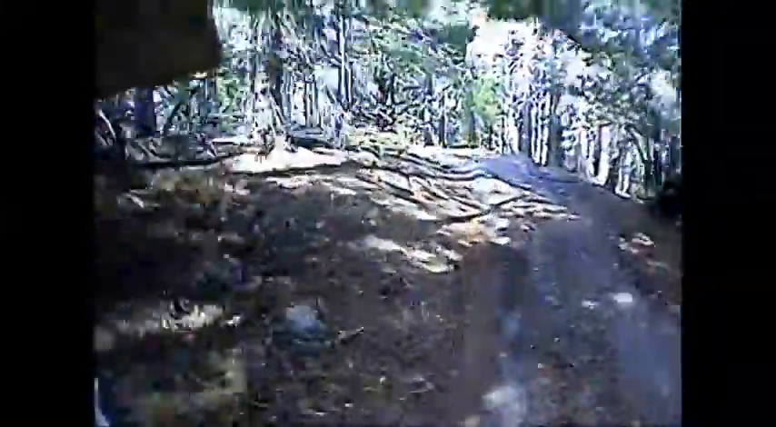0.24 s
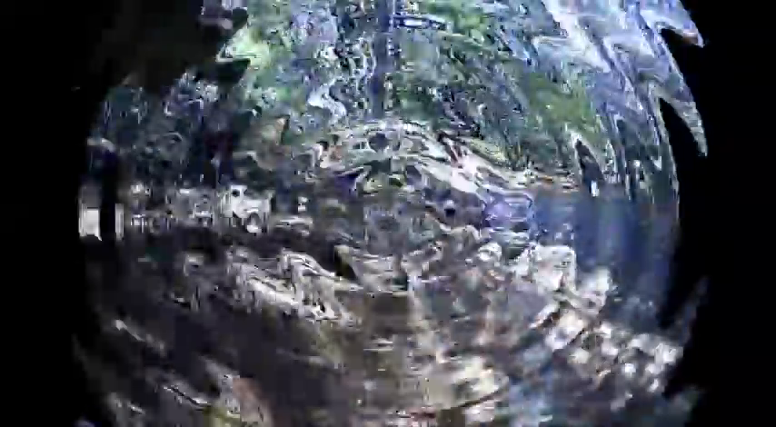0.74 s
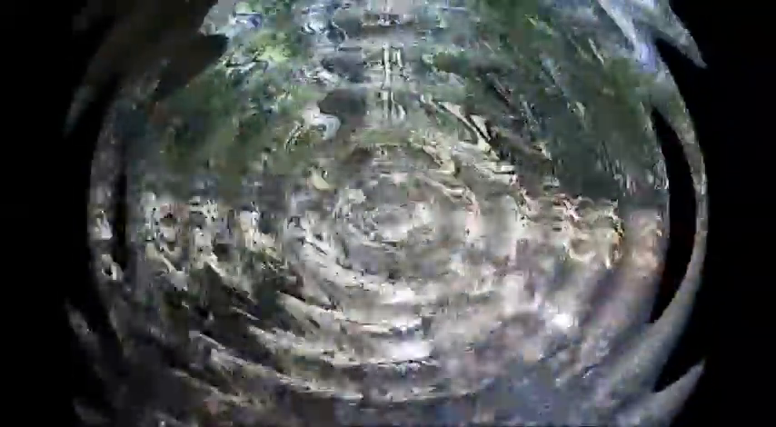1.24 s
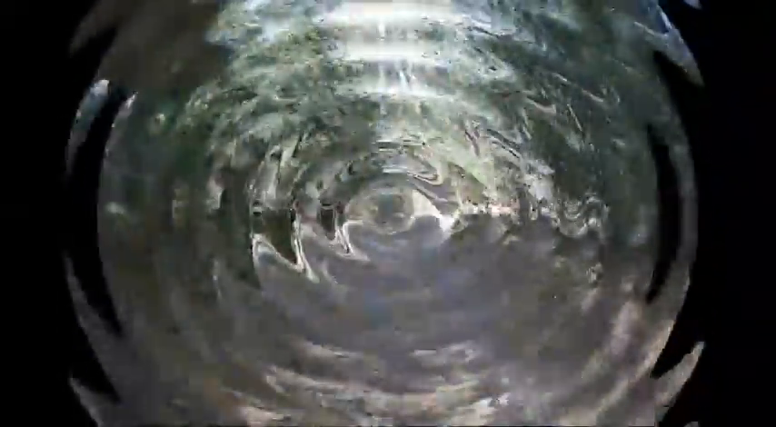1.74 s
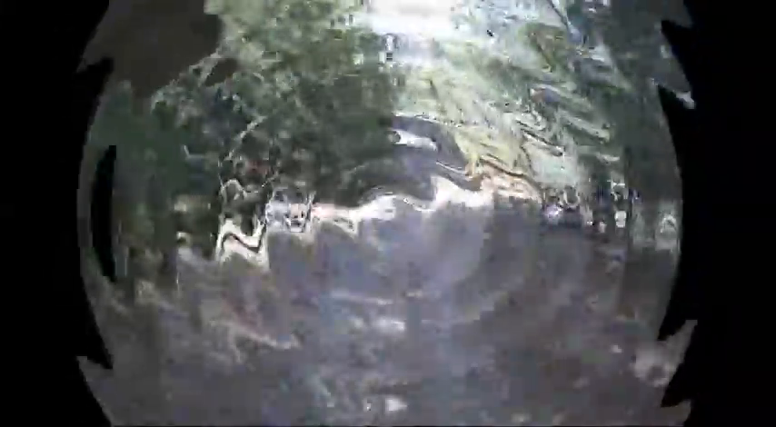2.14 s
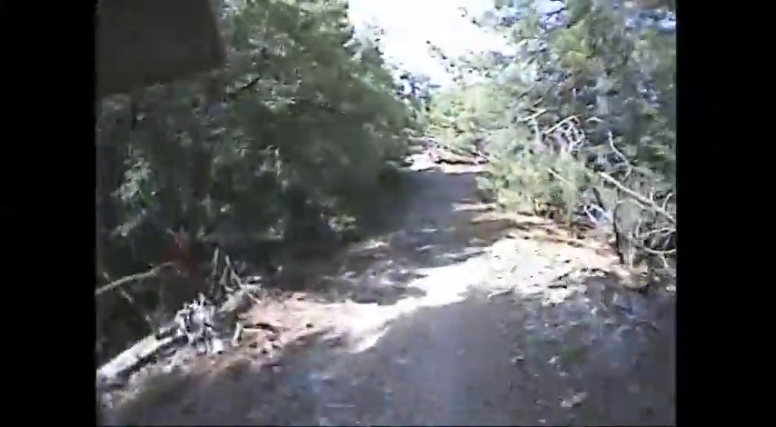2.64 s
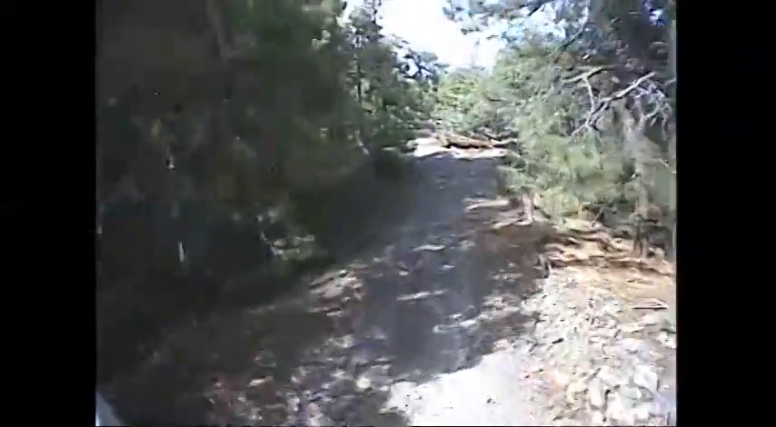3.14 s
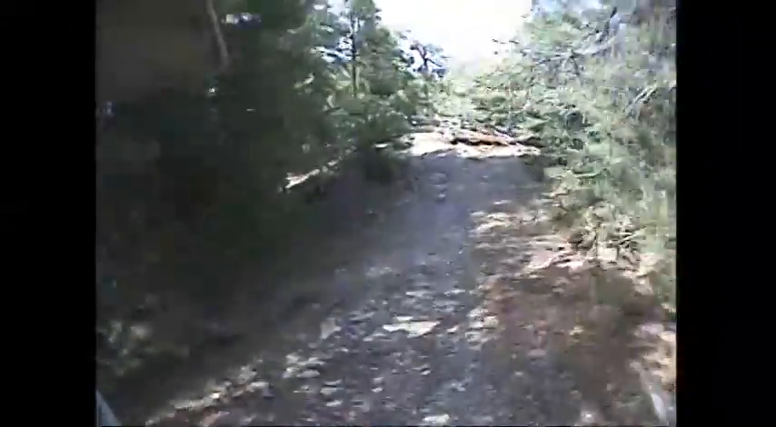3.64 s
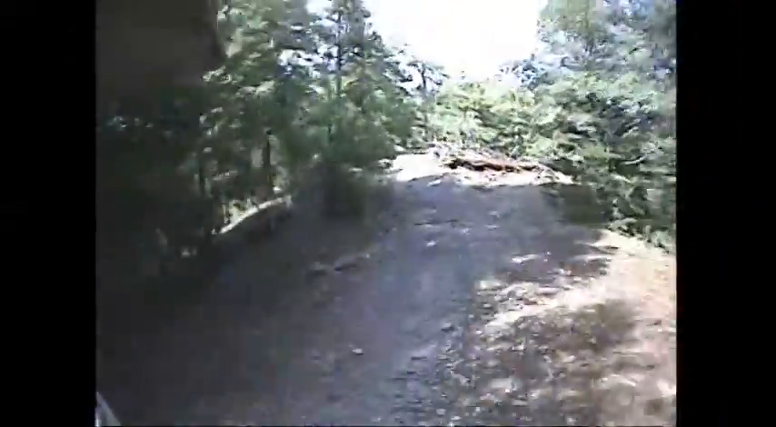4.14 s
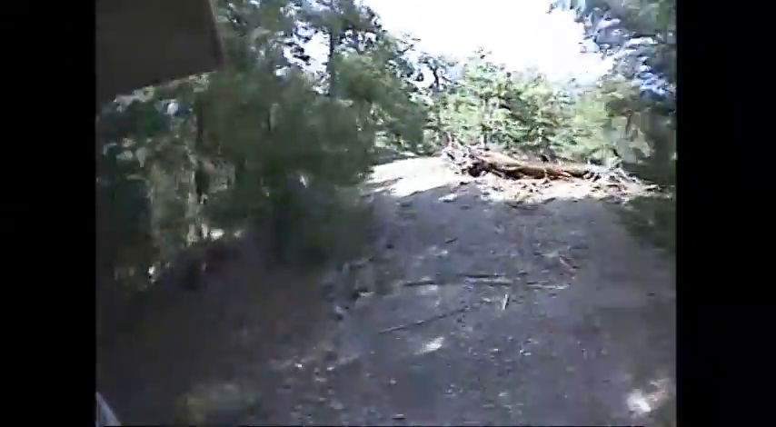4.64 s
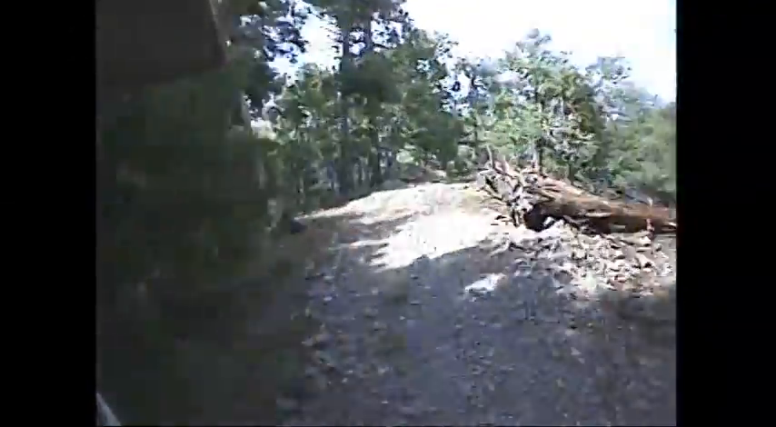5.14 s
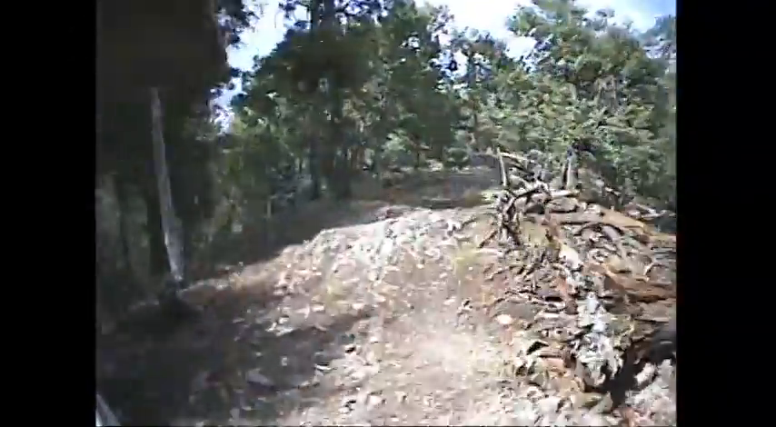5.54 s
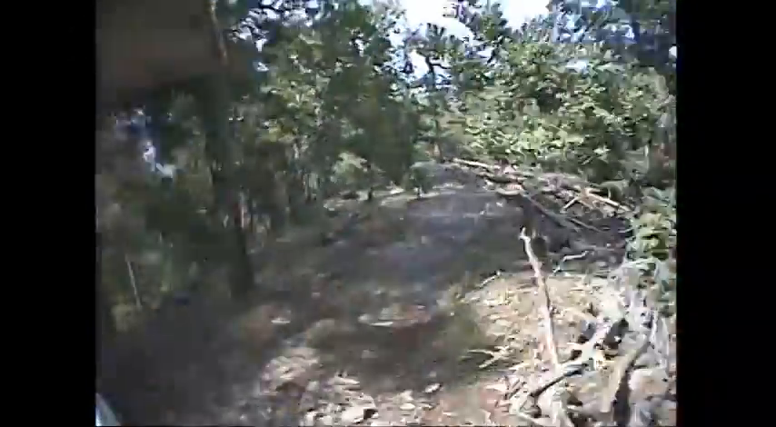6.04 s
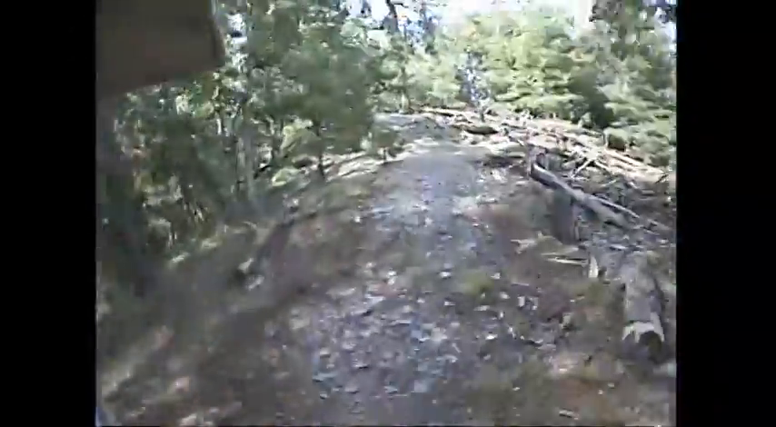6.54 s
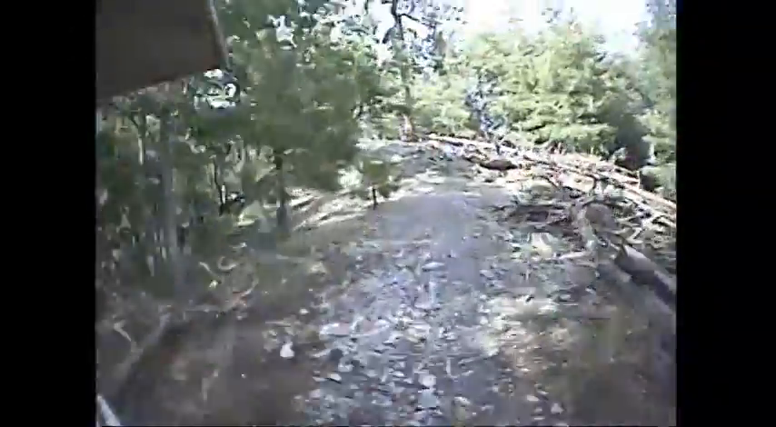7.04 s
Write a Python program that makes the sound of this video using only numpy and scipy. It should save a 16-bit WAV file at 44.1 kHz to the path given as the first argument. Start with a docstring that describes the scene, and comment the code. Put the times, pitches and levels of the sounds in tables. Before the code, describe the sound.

A bike rolls along a rough forest trail, wind rumbling, frame jolting and clunking over stones, with a burst of sharp twig cracks near the end.

```python
"""On a stony forest trail a bicycle rolls along, heard by a small microphone in a housing fixed to it.
Wind is slow, deep noise at the port (the housing's sound opening); tyres and hiss are coloured noise.
Stones shake the frame, which rings low and in the middle, or knock a tube with short blunt blows.
Grit ticks ring the housing; twigs brush past as scratchy noise, squeak and whip it.
Short fading tones make snaps and add treble to the cracks of the whipping twigs."""
import sys
import numpy as np
from scipy.fft import rfft, irfft, next_fast_len
from scipy.io import wavfile
from scipy.ndimage import uniform_filter1d, map_coordinates

SR = 44100
rng = np.random.default_rng(int(sys.argv[2]) if len(sys.argv) > 2 else 0)


def bounce(signal):
    """Save signal as a 16-bit WAV file at the path given by the first command-line argument."""
    frames = np.transpose(np.atleast_2d(signal))
    limited = np.clip(frames, -1, 1)
    pcm = np.round(limited * 32767).astype(np.int16)
    wavfile.write(sys.argv[1], SR, pcm)


N = 321489

# Levels are settings that guide each layer: body gains and random swings also shape the final loudness.
# Wind strength over time: t/s, level/dB
WIND_LEVEL = [(0, -18.5), (.25, -19), (.45, -12.5), (.8, -21.5), (1.05, -18), (1.3, -21.5), (1.5, -17.5),
              (1.9, -20), (2.5, -24), (2.85, -21), (3.1, -18), (3.4, -23), (3.85, -16), (4.2, -18.5),
              (4.6, -14), (5.05, -15), (5.4, -18), (5.75, -20.5), (5.92, -24), (6.25, -23.5), (6.45, -17),
              (6.75, -24.5), (7.0, -23), (7.29, -25.5)]
# Colour of the wind noise: f/Hz, level per Hz/dB
WIND_COLOUR = [(4, 12), (9, -11.5), (30, 1), (70, -9.5), (150, -18.5), (260, -29), (600, -48),
               (1500, -82.5), (3000, -120)]
# Rolling sounds over time: t/s, frame rumble level/dB, tyre level/dB, hiss level/dB
ROLLING_LEVELS = [(0.0, -40, -48, -71), (0.36, -34, -49, -69), (0.63, -37, -50.5, -72),
                  (1.54, -41.5, -53, -74.5), (1.93, -38, -53, -74), (2.25, -37.5, -53, -73),
                  (2.7, -33.5, -50.5, -70.5), (3.13, -39.5, -50.5, -71.5), (4.18, -33.5, -47, -67),
                  (4.41, -29.5, -49, -66.5), (4.69, -31.5, -49, -70), (5.26, -29.5, -47, -67.5),
                  (5.6, -32.5, -49.5, -68), (5.97, -40.5, -52.5, -70), (6.25, -33.5, -51, -66),
                  (6.58, -36, -47.5, -63.5), (6.8, -43, -60, -63), (7.07, -38.5, -53.5, -71),
                  (7.29, -40, -53, -72.5)]
# Colour of tread on dirt: f/Hz, level per Hz/dB
TYRE_COLOUR = [(600, -26), (950, 1), (1400, -9.5), (1900, -14.5), (2400, -22), (3300, -20.5), (3950, -23),
               (4450, -37), (5500, -38), (7000, -42), (9000, -65.5)]
# Colour of the thin hiss: f/Hz, level per Hz/dB
HISS_COLOUR = [(4000, -33), (5500, -8.5), (7500, -12), (9000, -10.5), (10800, -5), (11900, -6),
               (13000, -2.5), (14000, -9), (15700, -18.5)]
# Twig squeaks: t/s, length/s, start f/Hz, end f/Hz, level/dB
SQUEAKS = [(.122, 0.017, 10500, 10600, -61), (6.343, .02, 10500, 10700, -60),
           (6.372, .025, 11200, 11900, -51)]
# Short rings of snaps, and high rings within the twig cracks: t/s, level/dB, f/Hz
SNAP_RINGS = [(1.0975, -43, 2600), (4.0715, -37, 2600), (5.027, -49, 3000), (5.263, -33, 2100),
              (5.275, -32, 2400), (5.2877, -27.5, 3600), (5.2877, -30, 6000), (5.2877, -41, 8500),
              (5.298, -41, 3200), (5.299, -33, 11000), (5.2997, -37, 9500), (5.2996, -32, 2200),
              (5.3055, -42, 3300), (5.333, -44, 4000), (5.343, -46, 5000), (5.435, -45, 9000),
              (5.437, -34, 1500), (6.4218, -30, 9300), (6.4669, -23, 8240), (6.4218, -14, 5300),
              (6.4676, -12.5, 5650), (6.527, -35, 2100), (6.6043, -33, 2300), (6.7065, -43, 2600),
              (6.725, -26.5, 2400), (6.74, -33, 4200), (6.747, -26.5, 3000), (6.81, -40, 2800)]
# Brush strokes: t/s, length/s, low rasp level/dB, high rasp level/dB, wall level/dB, port level/dB
BRUSH_STROKES = [(0.11, 0.07, -64, -72, -66, -65), (1.099, 0.074, -58, -63.5, -76, -74),
                 (4.26, 0.088, -64, -64, -61, -64), (5.143, 0.11, -62, -72, -57, -66.5),
                 (5.253, 0.091, -65, -69, -46.5, -57.5), (5.33, 0.11, -68, -75, -51.5, -69),
                 (6.024, 0.037, -78, -80, -55, -68), (6.152, 0.029, -61, -70, -59, -64),
                 (6.3, 0.085, -71, -71, -46.5, -66), (6.339, .09, -61, -61, -51.5, -61),
                 (6.406, 0.096, -60, -63, -46, -58), (6.45, 0.03, -41.5, -55, -50.5, -58),
                 (6.469, 0.07, -49.5, -67, -48, -58), (6.498, 0.092, -53, -62, -47, -61),
                 (6.541, 0.059, -58, -53, -46, -60.5), (6.583, 0.048, -58, -66.5, -62, -66.5),
                 (6.622, 0.078, -63, -72, -69, -69.5), (6.689, 0.044, -59, -68, -52, -63.5),
                 (6.725, 0.06, -55, -71, -46, -60.5), (6.77, 0.055, -58, -71, -53, -66),
                 (6.804, 0.18, -68, -77, -55.5, -70), (6.958, 0.057, -62, -73, -53, -66),
                 (6.997, 0.055, -57, -65, -53, -69), (7.03, 0.1, -67, -76, -57, -74)]
# The cavity under a steady rub: f/Hz, width/Hz, level/dB
RASP_MODES = [(3900, 1100, 0), (5350, 1100, 0)]
# Grit hits: t/s, level/dB, wall level relative to the hit/dB
GRIT_TICKS = [(0.075, -54, -3), (0.115, -48, 10), (0.3177, -34.5, -15), (0.481, -35, -8), (0.655, -53, -7),
              (0.661, -53, 5), (0.839, -42, -13), (0.87, -34.5, -19), (0.823, -55, -5), (0.831, -53, -5),
              (0.9353, -54, -4), (0.94, -56, 1), (0.969, -54, -5), (1.128, -43, 1), (1.2273, -52, -4),
              (1.267, -56, -5), (1.3468, -51, 0), (1.5942, -42, -9), (1.7394, -50, 2), (1.8821, -53, 6),
              (2.048, -48, -15), (2.7845, -45.5, 5), (3.137, -40.5, -9), (3.4057, -45, 7),
              (3.852, -36.5, -17), (3.921, -49, 1), (4.0503, -47, -12), (4.0713, -33.5, 1), (4.271, -41, 1),
              (4.3009, -35, -17), (4.8908, -49, 11), (5.101, -49, 0), (5.147, -46, 12), (5.151, -54, 8),
              (5.172, -54, 5), (5.208, -52, 5), (5.221, -45, -9), (5.587, -44, -10), (5.837, -53, 19),
              (6.0965, -54, 17), (6.308, -50, 0), (6.319, -50, 12), (6.378, -45, 0), (6.4077, -39, -6),
              (6.4172, -47, 5), (6.431, -40, 0), (6.447, -42, -5), (6.494, -35, -13), (6.573, -35, -5),
              (6.605, -41, -5), (6.668, -47, -12), (6.7249, -40, -5), (6.775, -37.5, -10),
              (6.844, -45.5, 16.5), (6.857, -36.5, -20), (6.9166, -50, 15), (6.977, -42, 8),
              (7.004, -43, 11), (7.0084, -40, -13), (7.021, -44, -12), (7.0328, -38.5, -9),
              (7.0645, -51, 11), (7.0903, -51, -5), (7.084, -53, -5), (7.1144, -53, -3), (7.1916, -52, -8)]
# Twigs whipping the housing: t/s, level/dB, wall and port levels relative to the hit/dB, 60 dB fall time/s
TWIG_CRACKS = [(6.4212, -10, 4, -27, .0003), (6.4569, -27, 15, -35, .0003), (6.4657, -32, 14, -24, .0003),
               (6.467, -17, 0, -4, .0025), (6.4675, -18, -15, -20, .0003), (6.468, -16, -15, -20, .0003)]
# Cavity in front of the microphone: f/Hz, width/Hz, level/dB
CAVITY_MODES = [(3980, 650, 8), (5250, 1100, -1.5), (6700, 2000, -5)]
# The housing's wall: f/Hz, width/Hz, level/dB
WALL_MODES = [(600, 400, 2.5), (1410, 610, 7), (2930, 2300, -0.5)]
# The port's upper resonances: f/Hz, width/Hz, level/dB
PORT_MODES = [(8500, 1500, 2), (10800, 1500, -4), (12900, 1500, 1)]
# Hard stones on the tube: t/s, level/dB, bright part relative to the blow/dB
TUBE_KNOCKS = [(0.321, -25, -23), (0.739, -31, -23), (1.647, -15.5, -15), (1.746, -17.5, -14),
               (1.786, -19, -28), (2.208, -20, -24), (2.502, -22.5, -13), (2.659, -30, -23),
               (3.446, -40, -18), (3.724, -17, -21), (4.064, -33, -13), (4.267, -21, -20), (4.51, -19, -20),
               (4.531, -15, -21), (4.55, -33, -22), (5.226, -26, -23), (5.261, -10.5, -14),
               (5.347, -16, -39), (5.5691, -8, -35), (5.572, -17.5, -26), (5.839, -34.5, -5.5),
               (6.038, -26, -11), (6.117, -34, -23), (6.909, -21.5, -14.5), (7.107, -25, -20)]
# The struck tube: f/Hz, width/Hz, level/dB
TUBE_MODES = [(713, 405, 4), (1150, 660, 2.5)]
# Large stones under the bicycle: t/s, level/dB, low resonance relative to the jolt/dB
LARGE_JOLTS = [(0.053, -19.5, -19), (0.087, -19.5, -15), (0.143, -17, -6.5), (0.312, -18, -10),
               (0.322, -10.5, -22), (0.333, -20, 2.5), (0.37, -19.5, -18), (0.382, -16, -4.5),
               (0.458, -16, -6), (0.58, -17, -20), (0.739, -17.5, -8), (0.947, -17.5, -9),
               (1.161, -20, -11), (1.934, -25, 10), (1.971, -20.5, -8), (2.261, -26, -4), (2.658, -19, -15),
               (2.694, -15, -4), (2.737, -32, -10), (3.215, -20.5, 2), (3.446, -17.5, -10),
               (3.491, -18.5, -14), (3.603, -14.5, -21), (3.727, -15.5, -16), (3.823, -12.5, -24),
               (3.986, -12.5, -13), (4.063, -16.5, -14), (4.118, -20, -8), (4.148, -16.5, -21),
               (4.163, -16, -21), (4.211, -27.5, 15.5), (4.268, -16.5, 8), (4.349, -13, -2.5),
               (4.389, -14, -18), (4.449, -9.5, -5), (4.471, -10, 2.5), (4.511, -20, 4), (4.531, -23, 12),
               (4.597, -15.5, -7), (4.653, -17, -9), (4.806, -14.5, -7), (4.86, -20, 12), (4.919, -18, 9.5),
               (5.146, -12, -2), (5.225, -14, -25), (5.2748, -12, -24), (5.282, -16, -19), (5.345, -14, -2),
               (5.512, -21, -15), (5.573, -29, -11), (6.038, -18.5, -12), (6.115, -19.5, 2),
               (6.227, -20, -14), (6.244, -17.5, 6.5), (6.278, -29.5, 7.5), (6.327, -8.5, -4),
               (6.464, -14.5, 6), (6.697, -15.5, -8), (6.748, -15.5, -2.5), (6.851, -20, -10),
               (7.002, -29.5, 11), (7.104, -18, -22), (7.2, -23, -26)]
# The frame, lowest resonance first: f/Hz, width/Hz, level/dB
FRAME_MODES = [(296.8, 62, 0.5), (495, 192, -4), (692, 94.5, 0), (858, 137, -7.5)]
# Loose parts: f/Hz, width/Hz, level/dB
LOOSE_PART_MODES = [(1113, 270, 6.5), (1988, 960, -14.5)]

TOP_HZ = 15800
GUST_DB, GUSTS_PER_S = 2.5, 6  # size and pace of the random gusts
SNAP_CYCLES = 4  # a ring fades by 30 dB in this many cycles
STROKE_RISE, STROKE_FALL = .8, 1.2  # powers that round the swell and the fade
CATCHES_PER_S, CATCH_DB, CATCH_SPREAD_DB = 500, 11, 3.5  # needles that catch and let go
FINE_TICKS, FINE_TICK_DB = 8, -55  # extra ticks at random times
TICK_PORT_DB, TICK_T60_S = -26, .00025  # port share of a tick, and time for its push to fall 60 dB
SMALL_JOLTS = 14  # extra jolts at random times
SMALL_JOLT_DB, SMALL_SPREAD_DB = 4.5, 2.5  # level over the rumble setting, scatter
JOLT_T60_S = 0.072  # fall time of a shudder's envelope
KICK_DB = 1  # first blow of a jolt, over its shudder


def amp(db):
    """Turn decibels into a gain."""
    return 10 ** (np.asarray(db) / 20)


def unit(x):
    """Scale a sound to an average strength (rms) of 1."""
    return x / np.sqrt(np.mean(x ** 2) + 1e-20)


def curves(rows):
    """Draw straight lines between table rows: one curve for each column after the time."""
    times, *columns = np.transpose(rows)
    return [np.interp(np.arange(N) / SR, times, column) for column in columns]


def wobble(rate):
    """Make a smooth random curve through a given number of random points a second."""
    points = rng.standard_normal(int(N * rate / SR) + 4)
    return map_coordinates(points, [np.arange(N) * rate / SR])


def filtered(x, response):
    """Change the strength and phase of each frequency in a sound."""
    size = next_fast_len(N + SR // 2)
    spectrum = rfft(x, size) * response(np.fft.rfftfreq(size, 1 / SR))
    return irfft(spectrum, size)[:N]


def noise(colour):
    """Colour random noise by a table of frequencies and levels, at rms 1."""
    f, db = np.transpose(colour)

    def response(hz):
        return amp(np.interp(np.log(hz + 1), np.log(f + 1), db, -120, -120))

    return unit(filtered(rng.standard_normal(N), response))


def ring(x, modes):
    """Pass a sound through a body's resonances, where narrow ones ring longer."""
    def response(f):
        total = 0
        for k, (centre, width, db) in enumerate(modes):
            resonance = 1j * f * width / (centre * centre - f * f + 1j * f * width)
            total = total + (-1) ** k * amp(db) * resonance  # neighbours have opposite signs
        return total

    return filtered(x, response)


def dull(x, corner_hz, order):
    """Soften the treble, as rubber and clamps do; a higher order softens more."""
    return filtered(x, lambda hz: (1 + 1j * hz / corner_hz) ** -order)


def add(track, s, burst):
    """Lay a short sound on the track at time s."""
    part = track[round(s * SR):][:len(burst)]
    part += burst[:len(part)]


def wind():
    """Eddies press on the port; the diaphragm stiffens and flattens the strongest pushes."""
    level_db, = curves(WIND_LEVEL)
    pressure = unit(np.tanh(0.27 * noise(WIND_COLOUR)))
    return amp(level_db + GUST_DB * wobble(GUSTS_PER_S)) * pressure


def squeaks():
    """A twig slipping by gives a thin, rough whistle that slides upward."""
    track = np.zeros(N)
    for s, length, from_hz, to_hz, db in SQUEAKS:
        n = round(length * SR)
        rough = unit(uniform_filter1d(rng.standard_normal(n), size=40))
        phase = 2 * np.pi * np.cumsum(np.linspace(from_hz, to_hz, n)) / SR
        swell = np.hanning(n) ** .5
        add(track, s, amp(db + 2.5) * swell * rough * np.sin(phase))
    return track


def snap_rings():
    """Each row is one short ring at a set pitch; near-simultaneous rows form one snap or brighten a crack."""
    track, t = np.zeros(N), np.arange(400) / SR
    for s, db, hz in SNAP_RINGS:
        fade = amp(db + 5.5 - 30 * t * hz / SNAP_CYCLES)
        onset = 1 - np.exp(-2 * t * hz)
        add(track, s, fade * np.sin(2 * np.pi * hz * t) * onset)
    return track


def brush():
    """Twigs drag over the housing: dense scratches and sparse catches swell and fade in each stroke."""
    roughness = amp(1.2 * wobble(90) + 1.5 * wobble(250) + 2.4 * wobble(1100))
    scratches = rng.standard_normal(N) * roughness
    catches = rng.random(N) < CATCHES_PER_S / SR
    catch_db = CATCH_DB + CATCH_SPREAD_DB * rng.exponential(size=N).clip(0, 3)
    scratches += catches * rng.choice([-1, 1], N) * amp(catch_db)

    # each rasp resonance acts twice, which narrows it
    rasps = [(-1) ** k * ring(ring(scratches, [mode]), [mode]) for k, mode in enumerate(RASP_MODES)]
    wall = dull(ring(scratches, WALL_MODES), 4300, order=2)
    port = ring(ring(scratches, PORT_MODES), [(9500, 6000, 0)])

    pressure = np.zeros((4, N))
    for s, length, *levels_db in BRUSH_STROKES:
        u = np.linspace(0, 1, round(length * SR))
        swell = u ** STROKE_RISE * (1 - u) ** STROKE_FALL
        for track, db in zip(pressure, levels_db):
            add(track, s, amp(db) * swell / swell.max())
    return sum(gain * unit(body) for gain, body in zip(pressure, [*rasps, wall, port]))


def ticks():
    """Grit and twigs hit the housing: a sharp, rough push rings its cavity, wall and port."""
    cavity_push, wall_push, port_push = np.zeros((3, N))
    t = np.arange(256) / SR
    fine = [(s, FINE_TICK_DB + rng.normal(0, 1.9), 0) for s in rng.random(FINE_TICKS) * N / SR]
    hits = [(*tick, TICK_PORT_DB, TICK_T60_S) for tick in GRIT_TICKS + fine] + TWIG_CRACKS
    for s, db, wall_db, port_db, t60 in hits:
        rough = np.clip(t60 / 0.001, 0, 1.5)  # a longer contact chatters
        push = amp(-60 * t / t60) * (1 + rough * rng.standard_normal(len(t)))
        push = amp(db) * push / np.linalg.norm(push)
        for track, share_db in ((cavity_push, 0), (wall_push, wall_db), (port_push, port_db)):
            add(track, s + .0004, amp(share_db) * push)
    cavity = amp(18) * dull(ring(cavity_push, CAVITY_MODES), 11000, order=2)
    wall_ring = amp(12.5) * dull(ring(wall_push, WALL_MODES), 4300, order=3)
    bare_push = amp(-2.0) * dull(wall_push, 4600, order=2)
    port = amp(20.0) * ring(port_push, PORT_MODES)
    return cavity + wall_ring + bare_push + port


def tyres():
    """Tread on dirt gives a rough noise; grit and air at the port give a thin hiss."""
    _, tyre_db, hiss_db = curves(ROLLING_LEVELS)
    grit = amp(1.5 * wobble(25) + 1.56 * wobble(150))
    tread = amp(tyre_db) * unit(grit * noise(TYRE_COLOUR))
    hiss = amp(hiss_db + 0.73 * wobble(27)) * noise(HISS_COLOUR)
    return tread + hiss


def knocks():
    """A thrown stone gives the tube a short, blunt blow and a weaker rebound."""
    blows, taps = np.zeros((2, N))
    blow, tap = .7 * np.hanning(25), np.hanning(15)  # the tyre side is soft, the loose parts hard
    for s, db, bright_db in TUBE_KNOCKS:
        for delay, hit_db in ((.0012, 2), (.0034, -26)):  # the blow, then the rebound
            add(blows, s + delay, amp(db + hit_db) * blow)
            add(taps, s + delay, amp(db + hit_db + bright_db) * tap)
    tube = amp(8.5) * ring(blows, TUBE_MODES)
    loose_parts = amp(22.0) * ring(taps, LOOSE_PART_MODES)
    return dull(tube + loose_parts, 2600, order=3)


def frame_rumble(rumble_db):
    """Small stones shake the frame and its loose parts all the time."""
    stones = amp(2.12 * wobble(20) + 1.91 * wobble(60) + 2.5 * wobble(160))
    rumble = unit(dull(ring(stones * rng.standard_normal(N), FRAME_MODES), 1200, order=2))
    chatter = unit(dull(ring(stones * rng.standard_normal(N), LOOSE_PART_MODES), 2000, order=2))
    return amp(rumble_db) * (rumble + amp(-16.5) * chatter)


def frame_jolts(rumble_db):
    """Each jolt kicks the frame's resonances and leaves a dying shudder of ringing noise."""
    bodies = FRAME_MODES[1:], FRAME_MODES[:1], LOOSE_PART_MODES  # middle, low, loose parts
    shaking = np.array([ring(rng.standard_normal(N), modes) for modes in bodies])
    kick = np.array([ring(np.arange(N) == 0, modes)[:SR // 8] for modes in bodies])
    kick /= np.abs(kick).max(axis=1, keepdims=True)

    small = []
    starts = rng.integers(N, size=SMALL_JOLTS)
    for at, (size, low) in zip(starts, rng.standard_normal((SMALL_JOLTS, 2))):
        db = rumble_db[at] + SMALL_JOLT_DB + SMALL_SPREAD_DB * size
        small.append((at / SR, db, -3 + 5 * low))

    track, t = np.zeros(N), np.arange(SR // 8) / SR
    shape = amp(-60 * t / JOLT_T60_S) * (1 - np.exp(-t / 0.0011)) ** 2
    for s, db, low_db in LARGE_JOLTS + small:
        moment = round(s * SR) + np.arange(len(t))
        shudder = shape * np.take(shaking, moment, axis=1, mode="wrap")
        shudder /= np.abs(shudder).max(axis=1, keepdims=True)
        middle, low, clack = shudder + amp(KICK_DB) * rng.choice([-1, 1]) * kick
        add(track, s, amp(db - 6.0) * (middle + amp(low_db) * low + amp(-10.5) * clack))
    return dull(track, 1193, order=3)


def frame():
    """The frame carries a steady rumble and separate jolts from the stones."""
    rumble_db = curves(ROLLING_LEVELS)[0]
    return frame_rumble(rumble_db) + frame_jolts(rumble_db)


def scene():
    """All the sounds add up at one microphone."""
    surroundings = wind() + squeaks() + snap_rings() + brush()
    bicycle = ticks() + tyres() + knocks() + frame()
    return (surroundings + bicycle)[None]


def record(dry):
    """The recorder keeps nothing above its band limit."""
    return filtered(dry[0], lambda hz: hz < TOP_HZ)[None]


dry = scene()
out = record(dry)
bounce(out)
```